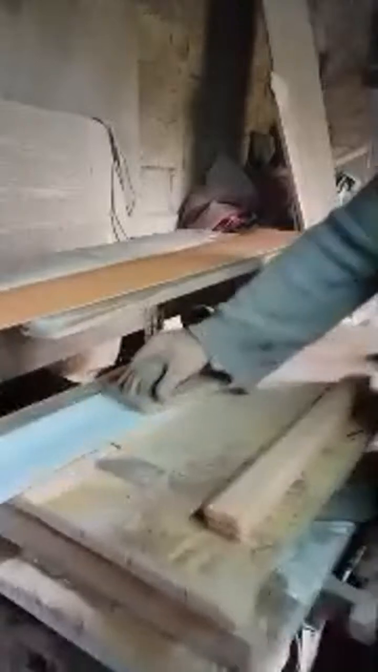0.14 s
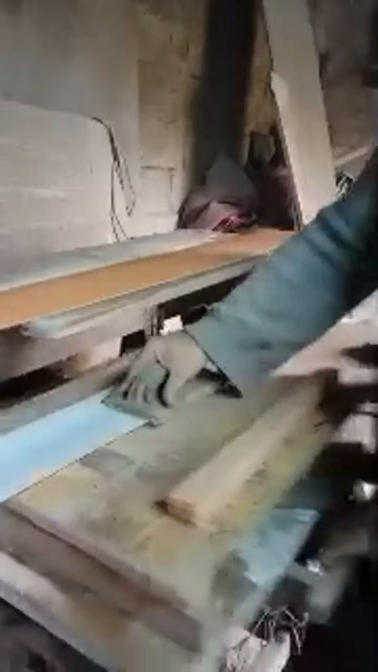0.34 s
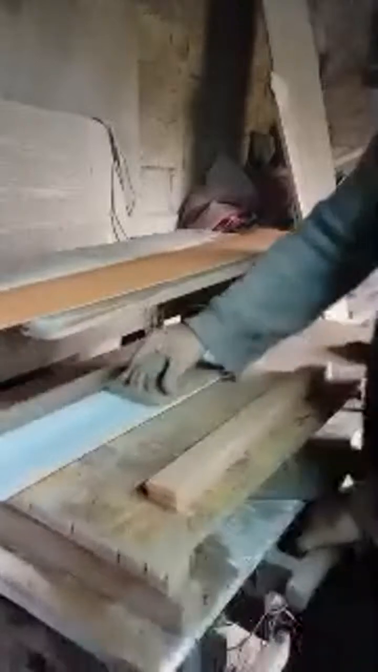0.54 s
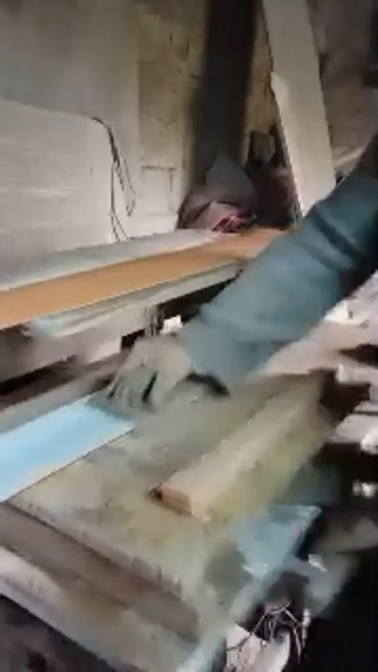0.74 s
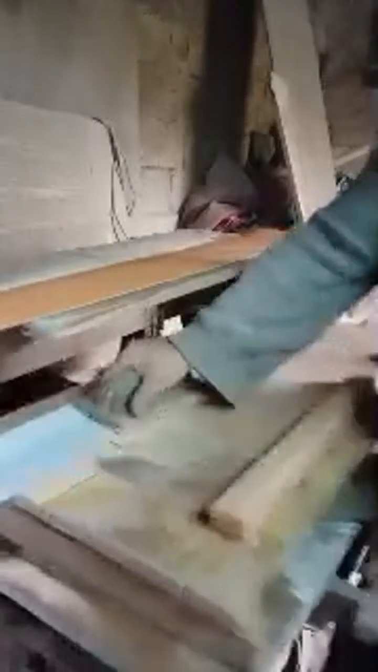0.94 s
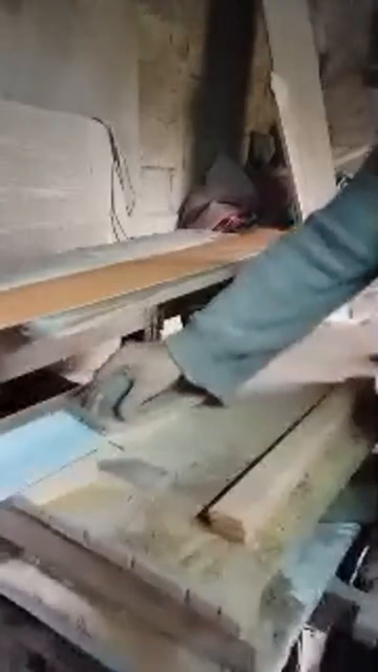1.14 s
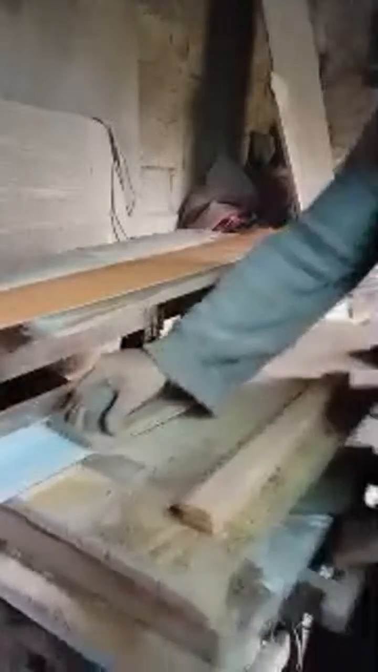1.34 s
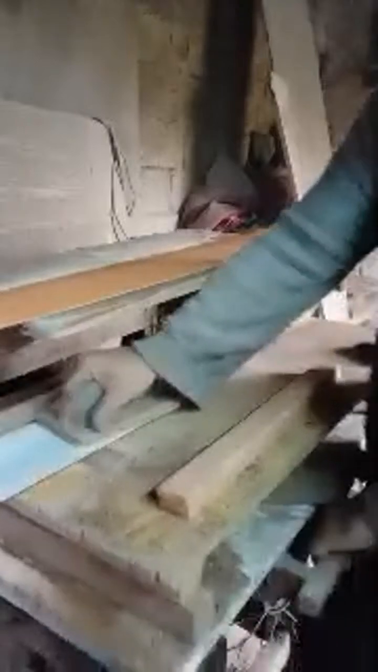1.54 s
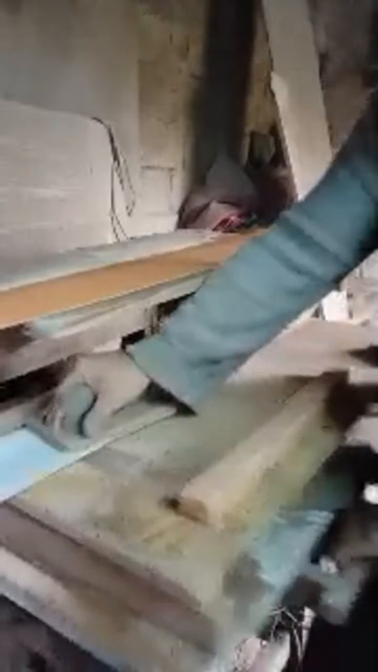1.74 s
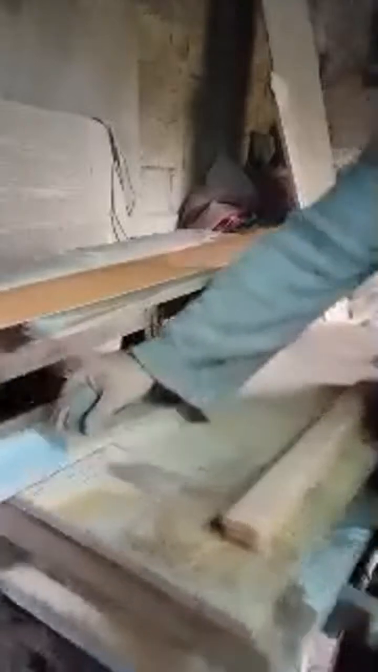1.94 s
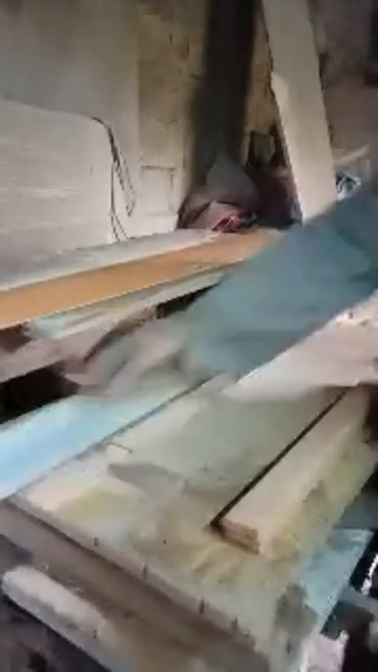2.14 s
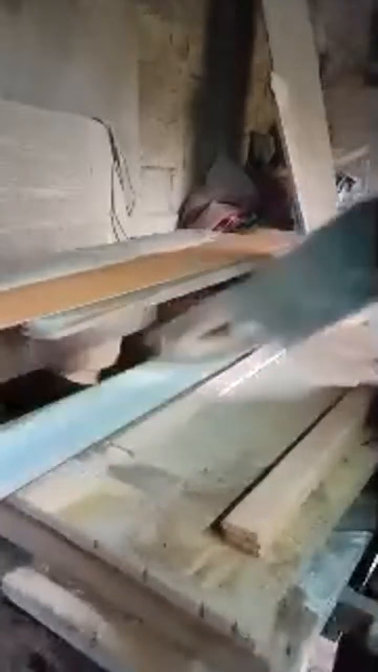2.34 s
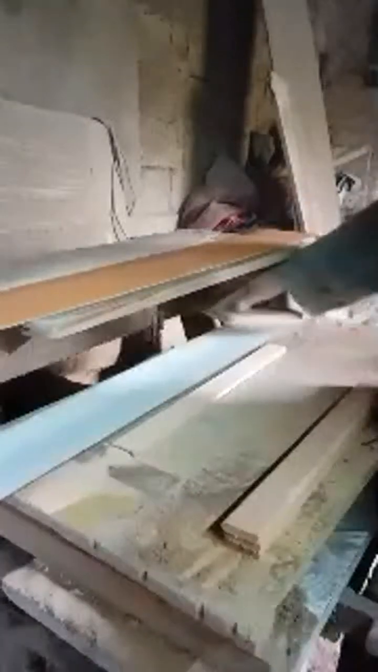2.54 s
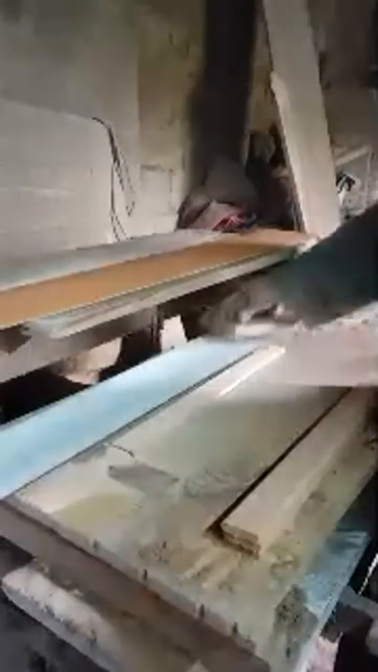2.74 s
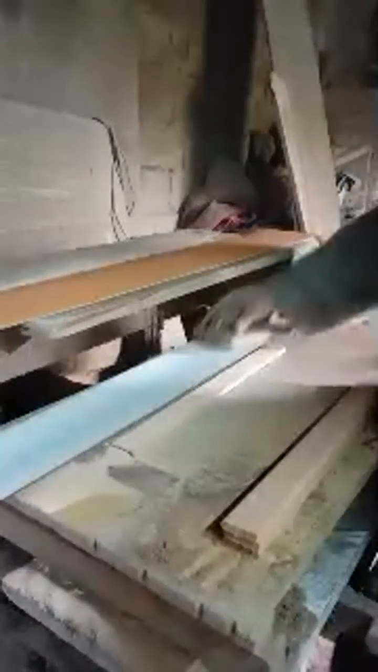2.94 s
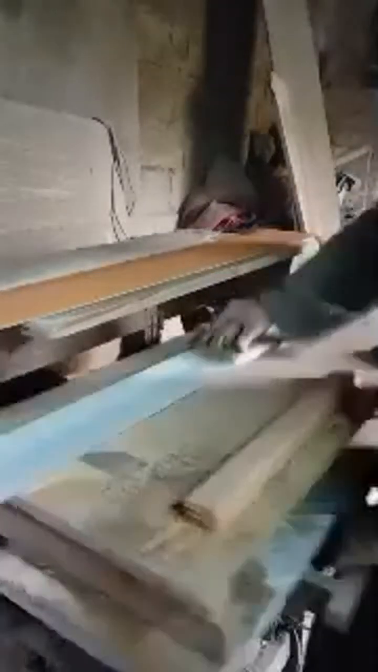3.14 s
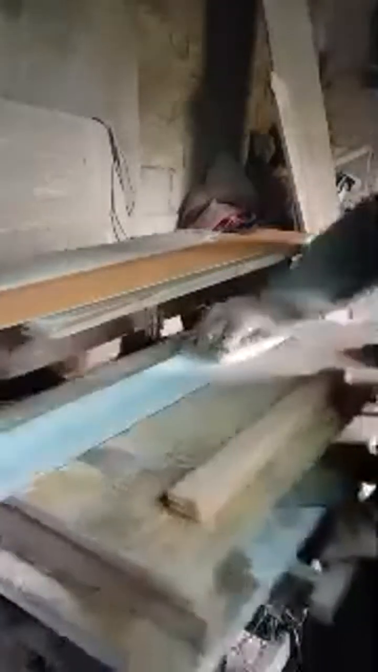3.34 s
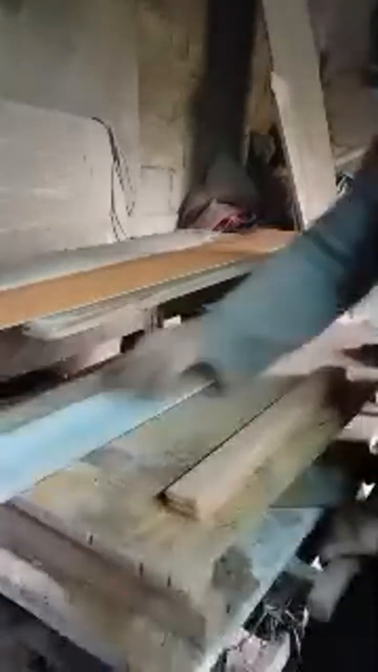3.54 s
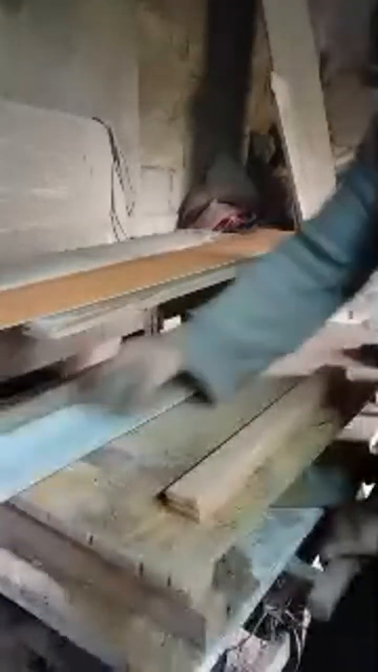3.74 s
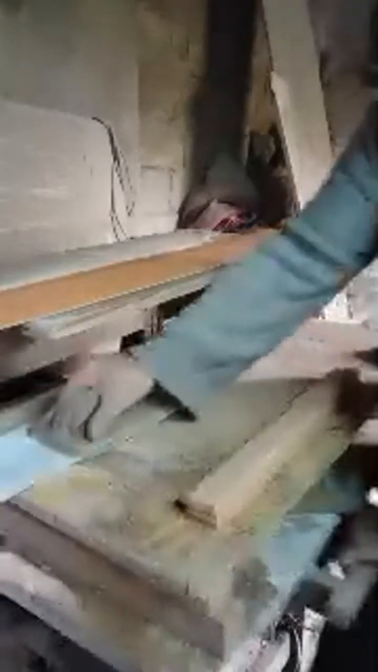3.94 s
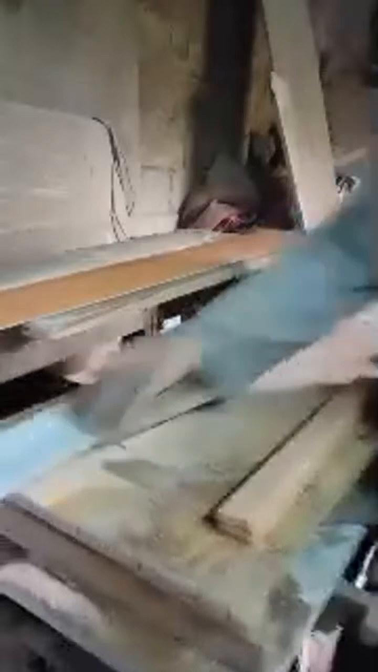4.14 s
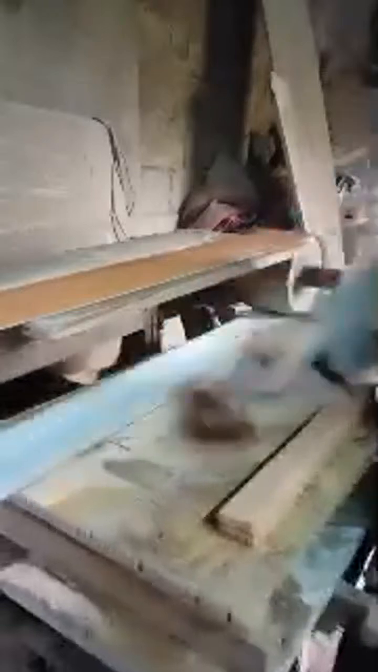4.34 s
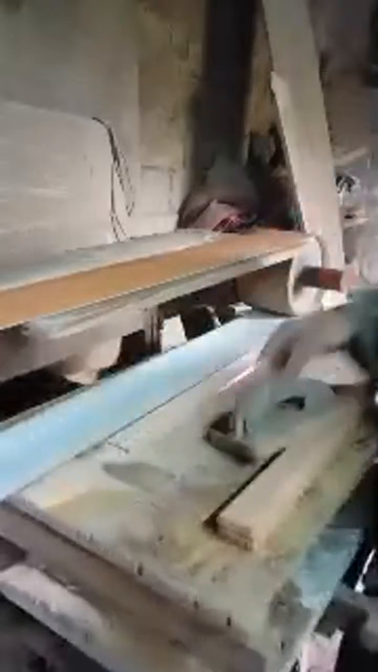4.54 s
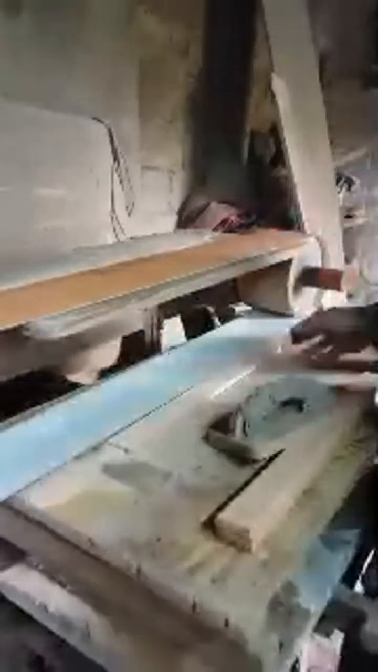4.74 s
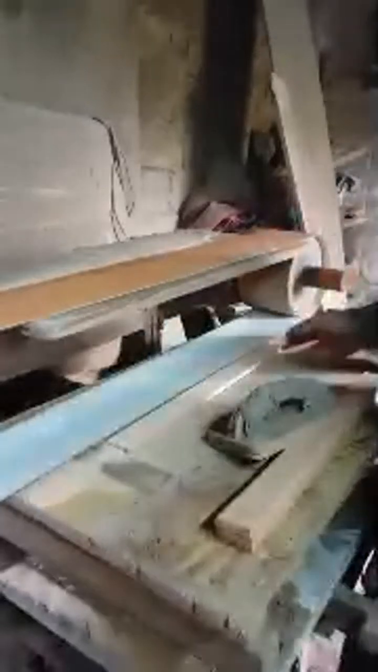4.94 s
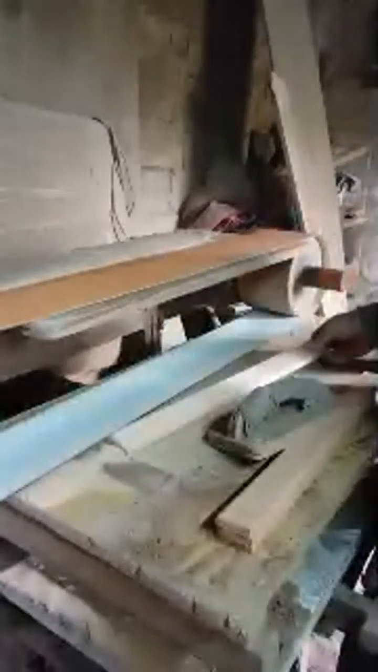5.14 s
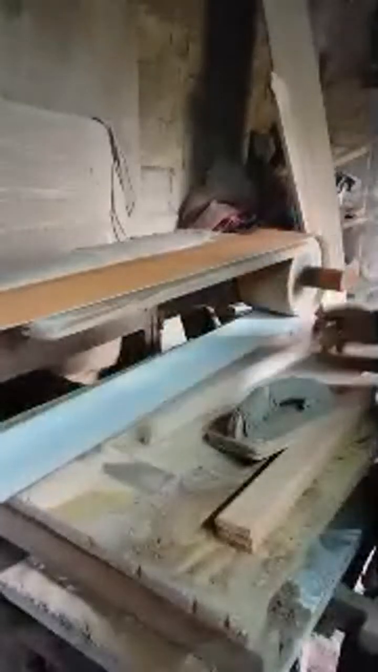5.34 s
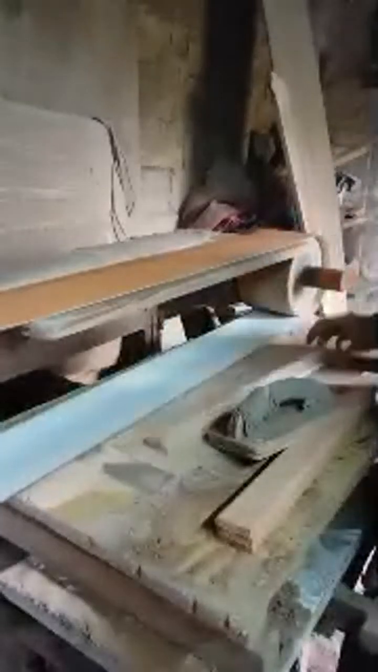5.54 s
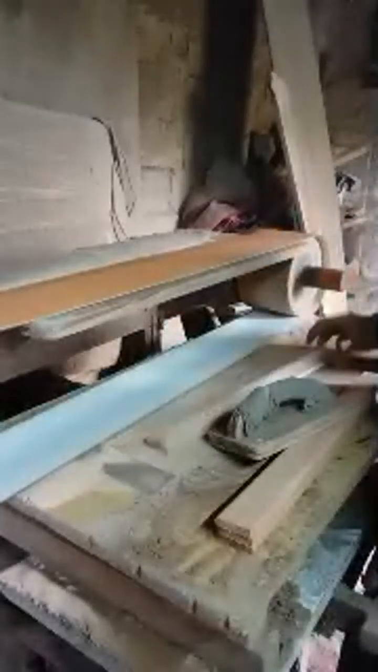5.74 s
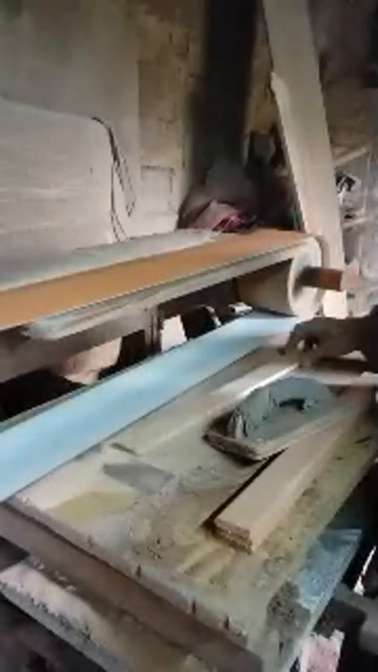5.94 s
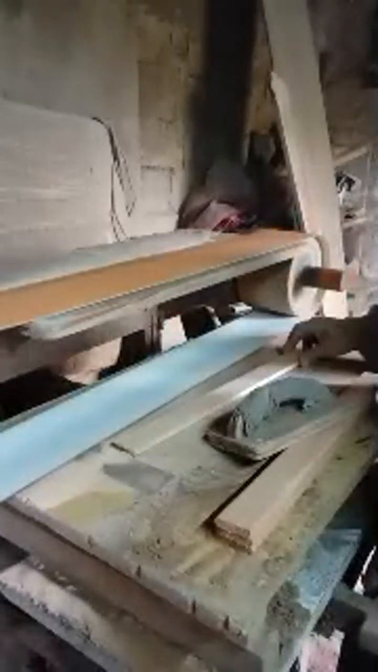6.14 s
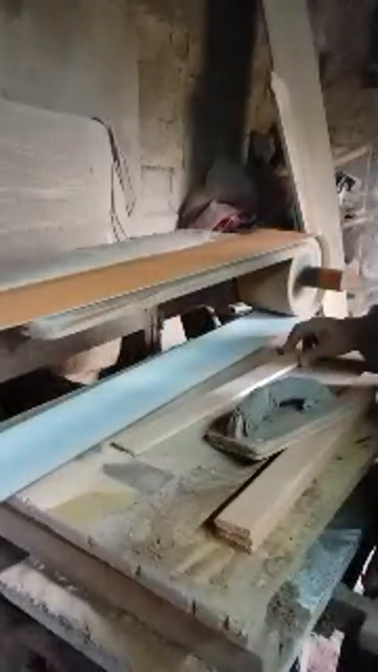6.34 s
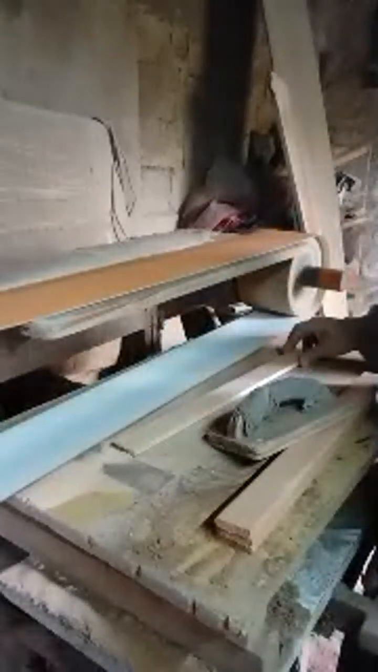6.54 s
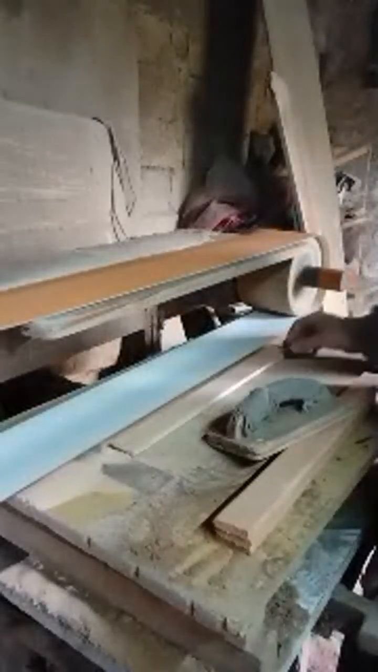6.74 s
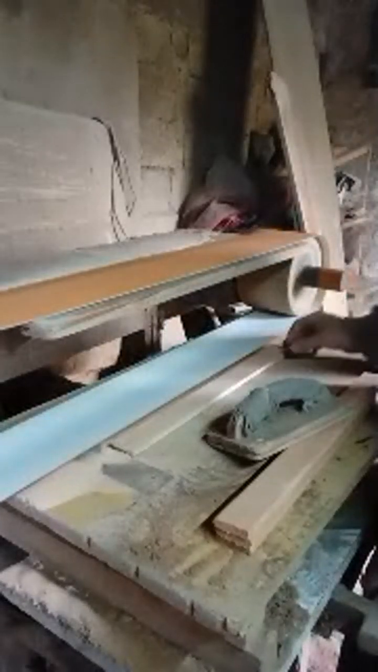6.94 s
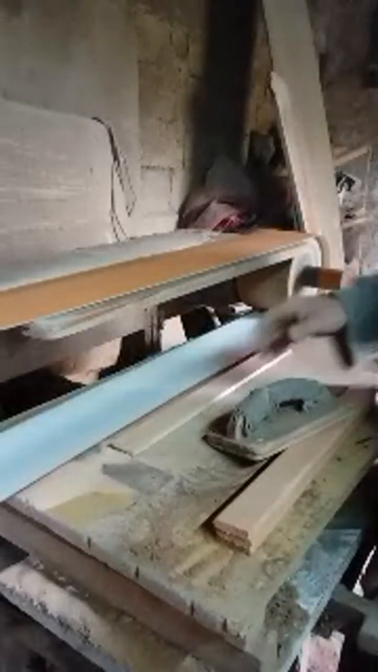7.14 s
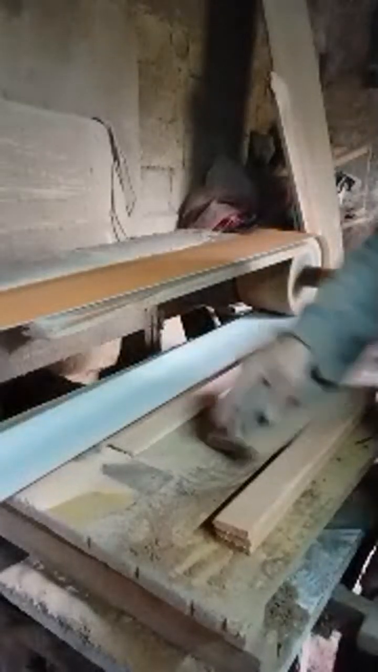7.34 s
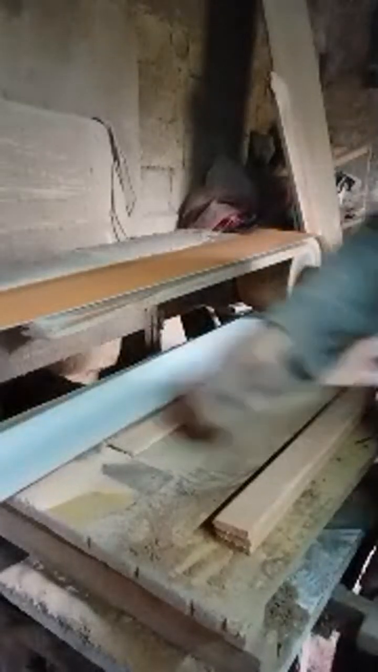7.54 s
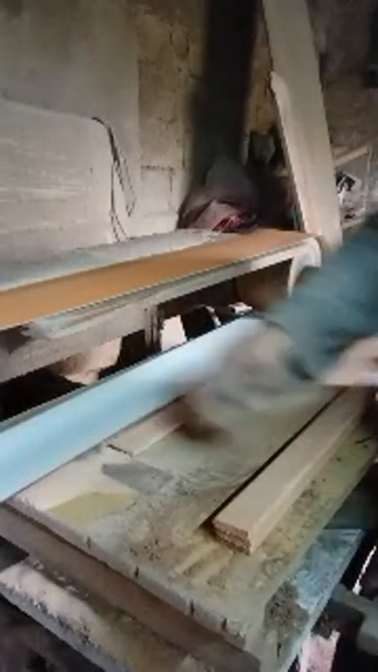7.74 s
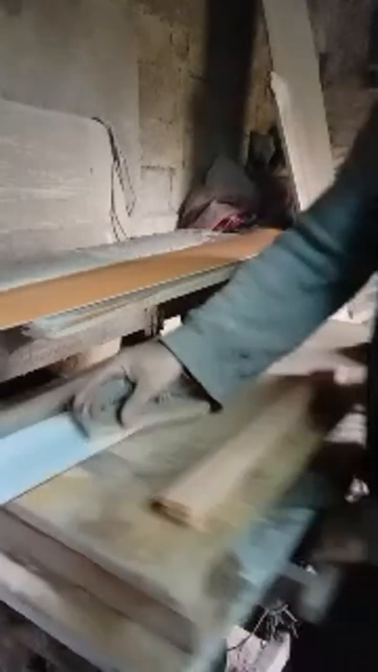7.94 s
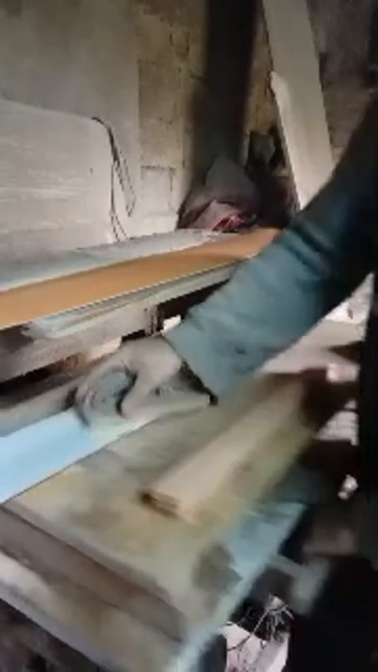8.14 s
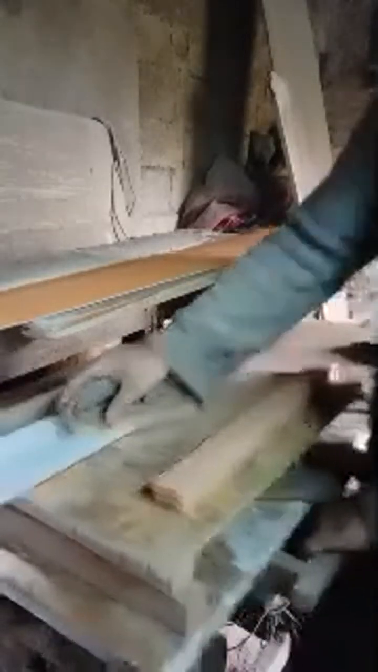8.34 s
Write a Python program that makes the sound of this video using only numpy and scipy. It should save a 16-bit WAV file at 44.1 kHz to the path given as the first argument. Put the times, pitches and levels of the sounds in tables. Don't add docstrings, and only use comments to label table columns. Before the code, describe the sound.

A belt sander runs in a small workshop, heard close on a phone, practically mono with slight treble smearing. From 0 to about 2.0 s wood is pressed to the belt: a loud, dense rasping hiss with a woody ring whose narrow squeals glide up and down, dipping briefly near 0.9-1.0 s. It lifts off, leaving a much quieter motor and belt wash with rattling parts and a fast tick-tock, about eleven turns per second. Faint grazes lead into another rasp from 2.9 to 4.0 s, with tiny dropouts near 3.8. Idle returns. At 4.4 s a pad lands with a sharp double crack and thud; brief belt touches come at 5.1; at 5.4 s a wooden strip slaps hard, ringing, and bounces until 5.5. Ticking and loose slaps continue. At 7.6 s a firm, more resonant rasp bursts in and lasts until the end, around 8.5 s.

```python
import sys
import numpy as np
from scipy import signal
from scipy.fft import rfft, irfft
from scipy.io import wavfile
from scipy.ndimage import uniform_filter1d

SR = 44100
rng = np.random.default_rng(int(sys.argv[2]) if len(sys.argv) > 2 else 0)


def put_to_file(sound):
    columns = np.atleast_2d(sound).T
    safe = np.clip(columns, -1, 1)
    whole_steps = np.round(safe * 32767)
    wavfile.write(sys.argv[1], SR, whole_steps.astype(np.int16))


def rack_gain(trim_db):
    fader = np.asarray(trim_db, float)
    return 10 ** (fader / 20)


N = 374405
HOP = 128

# mode_hz, level_db, t60_s
BENCH_MODES = [(200, -12, .022), (350, 0, .024), (420, 2, .022), (530, -5, .014), (800, -14, .01)]


def sanding():
    # start_s, ring_hz of the free length, bench_support_db
    pad_place = [(0, 1870, -8), (.3, 1820, -10.5), (.6, 1600, -11.5), (.75, 2000, -12), (.84, 2600, -7),
                 (.89, 1390, -13), (1.2, 2100, -13.5), (1.6, 1830, -14.5), (1.9, 1700, -20),
                 (2.95, 1960, -10), (3.4, 2200, -6.5), (3.72, 1900, -21.5), (3.95, 1830, -9.5),
                 (7.64, 1980, -16), (7.85, 1720, -17.5), (8.07, 1390, -24), (8.22, 1820, -13.5),
                 (8.49, 1600, -12)]
    # pitch_hz, level_db
    drone_colour = [(60, -48), (100, 6), (160, -22.5), (240, 5.5), (400, -5), (620, -0.5), (900, -2.5),
                    (2000, -22)]
    # pitch_hz, level_db
    fizz_colour = [(3000, -32), (7000, 2), (8000, 0.5), (10500, -2.5), (11800, -9), (16000, 4)]
    # start_s, end_s, level_db
    thinned = (8.14, 8.43, -6)
    thin_start_s, thin_end_s, thin_db = thinned
    place_s, place_ring_hz, place_support_db = np.transpose(pad_place)
    uneven = patches(patchy_db=1.6, bins=4.0, frames=45.0)

    def rasp_gain(hz, s):
        level, grip_db = pressure(s)
        ring_hz = np.interp(s, place_s, place_ring_hz)
        support_db = np.interp(s, place_s, place_support_db)
        hiss_share = 1 / (1 + rack_gain(grip_db) ** 2)
        ring_share = 1 - hiss_share

        lightness_db = -24 - 20 * np.log10(level + 1e-4)
        fizz_db = -9 - 0.27 * grip_db + 0.64 * np.minimum(lightness_db, 1)
        fizz_db += thin_db * np.clip(np.minimum(s - thin_start_s, thin_end_s - s) / 0.044, 0, 1)

        ring = hump(hz, ring_hz, 1280) * hz / (hz + 600) * squeals(hz, s)
        hiss_hz = 5660 - 46 * support_db
        hiss = hump(hz, hiss_hz, 2340 * rack_gain(0.16 * grip_db)) * hz / (hz + 3000)
        hiss = hiss / (1 + (hz / 7100) ** 24)
        drone = rack_gain(read(drone_colour, hz)) * frame(hz)
        fizz = rack_gain(read(fizz_colour, hz))

        power = hiss_share * in_band(hiss, hz, 5170, 7500) ** 2
        power += ring_share * in_band(ring, hz, 900, 3100) ** 2
        power += ring_share * (rack_gain(support_db) * in_band(drone, hz, 150, 700)) ** 2
        power += (rack_gain(fizz_db - 9.5) * in_band(fizz, hz, 9970, 12900)) ** 2
        return np.sqrt(power) * uneven[:, :len(s)]

    clicks = grains(per_s=4000., spread_db=2.5, cap=3.8)
    grit = evened(rng.standard_normal(N) + 0.4 * clicks)
    chatter_db = 1.14 * drift(0.016) + 0.14 * drift(0.03)
    level, _ = pressure(np.arange(N) / SR)
    return coloured(grit * rack_gain(chatter_db), rasp_gain) * level


def pressure(s):
    # start_s, rasp_level_db, grip_db as ring over hiss
    hand_strokes = [
        [(0, -26, -3), (.05, -25, -1.5), (.22, -22.5, 0.5), (.3, -23, -4.5), (.57, -24, 2.5), (.65, -25, 7.5),
         (.75, -21, 2), (.83, -22.5, -11), (.87, -26, -1)],
        [(1.04, -27.5, -5), (1.09, -22, -5.5), (1.22, -23.5, -2.5), (1.31, -24, 5), (1.35, -23, 0),
         (1.61, -22, 5), (1.92, -22.5, 3.5), (1.97, -37.5, 0), (2.06, -42, 8)],
        [(2.914, -42, 4), (2.93, -26.5, -1), (2.98, -24, 1.5), (3.32, -25.5, 6), (3.45, -24, 5), (3.6, -25, 2),
         (3.71, -20.5, 3), (3.93, -24, -3), (4.0, -44, 0)],
        [(7.628, -49, 2), (7.64, -28, 1), (7.66, -23, -3), (7.71, -20.5, 4.5), (7.85, -21.5, 7), (8.07, -23, 6),
         (8.2, -22.5, 5), (8.26, -22, 10.5), (8.49, -21.5, 6)],
    ]
    # start_s, length_s, level_db, growth_db
    belt_grazes = [
        (2.716, 0.21, -51, 11.5),
        (2.736, .008, -41, -1),
        (2.774, 0.018, -38.5, -1),
        (3.993, 0.056, -44, -6),
        (5.105, 0.031, -33.5, -11),
        (5.142, 0.036, -38.5, -1),
        (7.543, .08, -47.5, 4),
    ]
    touch_s, graze_grip_db = 0.01, 6
    stroke_s, stroke_db, stroke_grip_db = np.concatenate(hand_strokes).T
    level_db = np.interp(s, stroke_s, stroke_db)
    grip_db = np.interp(s, stroke_s, stroke_grip_db)

    ends_s = [hand_strokes[1][0][0]] + [stroke[-1][0] for stroke in hand_strokes[1:]]
    pressed = np.zeros(np.shape(s), bool)
    for stroke, end in zip(hand_strokes, ends_s):
        pressed |= (s >= stroke[0][0]) & (s <= end)

    power = pressed * rack_gain(level_db) ** 2
    for start, length, db, growth_db in belt_grazes:
        on = np.clip(np.minimum(s - start, start + length + touch_s - s) / touch_s, 0, 1)
        grown_db = db + growth_db * np.clip((s - start) / length, 0, 1)
        power = power + (on * rack_gain(grown_db)) ** 2
    return np.sqrt(power), np.where(pressed, grip_db, graze_grip_db)


def squeals(hz, s):
    # start_s, end_s, start_hz, end_hz, level_db above the ring
    squeal_glides = [(0, 0.454, 2730, 2880, 9), (.1, .62, 1480, 1470, 5), (.58, .8, 1800, 2500, 7),
                     (1.07, 1.27, 4500, 5000, 12), (1.3, 1.43, 1900, 1900, 6),
                     (1.45, 1.717, 2200, 1920, 5.5), (1.664, 2.017, 1970, 1820, 10),
                     (1.725, 1.99, 1220, 1190, 10), (2.95, 3.62, 2550, 2750, 1),
                     (3.7, 3.893, 1920, 1930, 8), (7.58, 7.77, 2050, 2000, 12.5),
                     (7.74, 7.938, 2040, 1800, 6.5), (7.895, 8.16, 1040, 1020, 9.5),
                     (7.85, 8.1, 1590, 1340, 2), (7.1, 8.1, 2400, 2300, 2), (8.154, 8.4, 1806, 1990, 7.5),
                     (8.32, 8.603, 1680, 1720, 15)]
    lift_db = np.zeros((len(hz), len(s)))
    for start, end, start_hz, end_hz, db in squeal_glides:
        now = (s > start) & (s < end)
        on = np.clip(np.minimum(s[now] - start, end - s[now]) / 0.048, 0, 1)
        glide_hz = np.interp(s[now], [start, end], [start_hz, end_hz])
        lift_db[:, now] += db * on * hump(hz, glide_hz, start_hz / 21)
    return rack_gain(lift_db)


def pad_drop():
    # start_s, peak_db, scrape_s of the contact, crack_db against the ring
    pad_hits = [
        (4.3745, -11.5, 0.004, 9),
        (4.379, -17.5, .01, -10),
        (4.410, -30, .006, -8),
        (4.439, -34, .003, 6),
    ]
    # start_s, peak_db, scrape_s, crack_db
    pad_thuds = [
        (4.3875, -10.5, 0.002, -15),
        (4.399, -18.5, 0.0012, -5),
        (4.420, -39, 0.0028, -10),
        (4.434, -37, 0.0023, -13),
    ]
    # mode_hz, level_db, t60_s
    pad_modes = [(1190, 4, 0.012), (2100, 8, 0.02), (3200, -8, 0.0062), (4200, -16, .006),
                 (5260, -12, .006), (6300, -6, .006), (9200, -12, .004)]
    return knocks(pad_hits, pad_modes) + knocks(pad_thuds, BENCH_MODES)


def strip_drop():
    # start_s, peak_db, scrape_s of the contact, crack_db against the ring
    strip_hits = [
        (5.3795, -16, .004, 1),
        (5.384, -4.5, .0005, -8),
        (5.389, -17, .014, 1),
        (5.420, -23, .015, 1),
        (5.4595, -13, .004, 1),
        (5.467, -12, .003, -2),
        (5.475, -19, .008, 1),
        (5.488, -18, .012, 1),
    ]
    # start_s, peak_db, scrape_s, crack_db
    strip_thuds = [
        (5.386, -29, .012, -12),
        (5.463, -22.5, .025, -8),
        (5.5, -31, 0.022, -13),
    ]
    # mode_hz, level_db, t60_s
    strip_modes = [(348, -9, 0.035), (428, -19, .025), (1490, -7, 0.031), (1700, -23, .012),
                   (2000, 21, 0.0079), (2320, 20.5, 0.0042), (3350, 0, 0.025), (3940, -14, 0.028),
                   (5500, 0, .012), (6300, 2, 0.0081)]
    return knocks(strip_hits, strip_modes) + knocks(strip_thuds, BENCH_MODES)


def knocks(events, modes):
    # pitch_hz, level_db
    crack_colour = [(200, -26), (450, -10), (950, -14), (1500, 3.5), (2400, -9.5), (5500, -9.5),
                    (6800, -31), (7800, -25), (12000, -27)]
    out, t = np.zeros(N), np.arange(4096) / SR
    ring = np.zeros(len(t))
    for k, (hz, db, t60) in enumerate(modes):
        direction = (-1) ** k
        ring += direction * rack_gain(db - 60 * t / t60) * np.sin(2 * np.pi * hz * t)
    colour = rack_gain(read(crack_colour, np.fft.rfftfreq(len(t), 1 / SR)))
    for s, db, scrape, crack_db in events:
        rough = rng.standard_normal(len(t))
        contact = np.exp(-t / max(scrape, 1e-4)) * (1 - np.exp(-t / 0.00028))
        crack = irfft(rfft(rough) * colour) * contact
        struck = signal.oaconvolve(rough * contact, ring)[:len(t)]
        blow = evened(struck) + rack_gain(crack_db) * evened(crack)
        add(out, s, rack_gain(db) * blow / abs(blow).max())
    return out


def ticks():
    out, t = np.zeros(N), np.arange(900) / SR
    for s, db, hz in beats():
        puff = rng.standard_normal(len(t))
        ring = np.sin(2 * np.pi * hz * t) * np.exp(-t / 0.0011) * (1 - np.exp(-t / 0.00027))
        snap = 0.2 * uniform_filter1d(puff, size=4) * np.exp(-t / 0.00059)
        thump_hz = 560 * rack_gain(puff[0])
        thump_shape = np.exp(-t / 0.0023) * (1 - np.exp(-t / 0.00038))
        thump = 0.88 * np.sin(2 * np.pi * thump_hz * t) * thump_shape
        add(out, s, rack_gain(db + 4.5) * (ring / ring.max() + snap + thump))
    return out


def beats():
    # first_tick_s, end_s
    pulley_runs = [
        (2.0128, 2.92),
        (4.0283, 6.07),
        (6.1299, 7.53),
    ]
    run_levels = [-37, -35, -33]
    # start_s, peak_db, pitch_hz
    loose_slaps = [(2.6869, -31, 2130), (4.7921, -40, 2300), (4.9602, -37, 2030), (5.266, -31, 3020),
                   (5.309, -38, 2460), (5.885, -31.5, 2500), (5.974, -28, 2700), (6.717, -32, 2200),
                   (6.895, -29, 2000), (6.7495, -34, 2300), (6.945, -32, 1800), (7.031, -34, 2500),
                   (7.292, -32, 1700)]
    turn_s, tock_after_s = .08843, .0572
    tick_hz, tock_hz, tock_db = 2730, 2200, -2.5
    rows = []
    for (first, end), db in zip(pulley_runs, run_levels):
        turns = np.arange(first, end, turn_s)
        rows += [(s, db, tick_hz) for s in turns]
        rows += [(s + tock_after_s, db + tock_db, tock_hz) for s in turns[:-1]]
    spread = [.0005, 0.4, 250]  # s, dB, Hz
    chance = np.clip(rng.standard_normal((len(rows), 3)), -2, 2) * spread
    return [*(rows + chance), *loose_slaps]


def idle(tick):
    # pitch_hz, level_db per Hz
    wash_colour = [(18, -50), (30, -14), (102, -7.5), (315, -5.5), (399, -11.5), (443, -11), (518, -6),
                   (656, -1), (996, -5.5), (1640, -1.5), (2300, -6.5), (3490, -14), (5890, -19.5),
                   (11300, -34.5), (15500, -28)]
    # pitch_hz, width_hz, level_db
    loose_parts = [(448, 48, -2), (618, 56, -6), (1535, 740, -4), (1920, 370, -5), (2500, 390, -7),
                   (3070, 880, -4), (4650, 1100, -9), (6160, 670, -12.5)]
    t = np.arange(2000) / SR
    shaken = signal.oaconvolve(abs(tick), np.exp(-t / 0.011))[:N]
    shaken = np.minimum(shaken / np.percentile(shaken, 90), 1.5)

    uneven = patches(patchy_db=2.0, bins=10.0, frames=15.0)
    flutter = rack_gain(1.1 * drift(0.011) + 1.8 * shaken)
    wash = coloured(rng.standard_normal(N), lambda hz, s: rack_gain(read(wash_colour, hz)) * frame(hz), size=2048)
    wash = coloured(evened(wash) * flutter, lambda hz, s: uneven[:, :len(s)])

    rattle = np.zeros(N)
    shared = grains(per_s=130., spread_db=3.0, cap=2.5)
    for hz, width_hz, db in loose_parts:
        own = grains(per_s=110., spread_db=4.0, cap=3.17)
        blows = (.5 * shared + own) * rack_gain(2.3 * shaken)
        ring = np.exp(-np.pi * width_hz * t) * (1 - np.exp(-t * hz / 0.48)) * np.sin(2 * np.pi * hz * t)
        rattle += rack_gain(db) * evened(signal.oaconvolve(blows, ring)[:N])
    return rack_gain(-39.42) * (evened(wash) + rack_gain(-6) * evened(rattle))


def frame(hz):
    # pitch_hz, width_hz, lift_db
    frame_modes = [(99.4, 14.4, 10), (124.6, 9.4, 15.5), (228.5, 26, 10.5), (329, 39, 10.5),
                   (392.7, 16, 11), (486, 6.7, 8), (476, 27, 9), (607, 84, 2.5), (940, 13, 3)]
    return rack_gain(sum(db * hump(hz, f, width / 2) for f, width, db in frame_modes))


def shop(x):
    # pitch_hz, t60_s
    room_decay = [(300, 0.22), (700, 0.2), (2000, 0.098), (8000, 0.08)]
    taps = np.zeros(SR // 2)
    at = np.arange(300, len(taps) - 20, 20)
    taps[at + rng.integers(0, 20, len(at))] = rng.choice([-1., 1.], len(at))
    tail = coloured(taps, lambda hz, s: rack_gain(-60 * s / read(room_decay, hz)), size=256)
    return signal.fftconvolve(x, tail / np.linalg.norm(tail))[:N]


def evened(x, axis=None):
    return x / np.sqrt(np.mean(x ** 2, axis, keepdims=True) + 1e-20)


def read(points, hz):
    f, value = np.transpose(points)
    return np.interp(np.log(hz + 1), np.log(f + 1), value)


def add(mix, s, sound):
    part = mix[round(s * SR):][:len(sound)]
    part += sound[:len(part)]


def drift(seconds):
    size = max(round(seconds * SR), 1)
    return evened(uniform_filter1d(uniform_filter1d(rng.standard_normal(N), size), size))


def grains(per_s, spread_db, cap):
    size_db = spread_db * np.minimum(rng.exponential(1, N), cap)
    size = rack_gain(size_db) * rng.choice([-1, 1], N)
    return evened(size * (rng.random(N) < per_s / SR))


def coloured(x, gain, size=1024):
    hz, s, z = signal.stft(x, SR, nperseg=size, noverlap=size - HOP)
    _, y = signal.istft(z * gain(hz[:, None], s), SR, nperseg=size, noverlap=size - HOP)
    return y[..., :len(x)]


def patches(patchy_db, bins, frames):
    field = rng.standard_normal((513, N // HOP + 9))
    field = uniform_filter1d(field, round(bins), 0)
    field = uniform_filter1d(field, round(frames), 1)
    return rack_gain(patchy_db * evened(field))


def in_band(shape, hz, lo_hz, hi_hz):
    inside = (hz > lo_hz) & (hz < hi_hz)
    return shape / np.sqrt(np.mean(shape ** 2 * inside, 0))


def hump(hz, centre_hz, width_hz):
    return 1 / (1 + ((hz - centre_hz) / width_hz) ** 2)


def window(rows, rest, soft):
    curve = np.full(N, rest)
    for s, length, db in rows:
        curve[round(s * SR):round((s + length) * SR)] = rack_gain(db)
    return uniform_filter1d(curve, round(soft * SR))


def scene():
    # pitch_hz, level_db
    knock_band = [(90, -17), (190, -1.5), (6600, 2.5), (7800, -5), (10500, -7), (12000, -32)]
    hits = pad_drop() + strip_drop()
    hits = coloured(hits, lambda hz, s: rack_gain(read(knock_band, hz)), size=512)
    tick = ticks()
    echoes = shop(rack_gain(-9) * hits + rack_gain(-9.5) * tick)
    mono = sanding() + hits + tick + idle(tick) + echoes
    return np.array([mono, mono])


def top_cut(x):
    return signal.sosfilt(signal.butter(12, 17130, fs=SR, output="sos"), x)


def record(dry):
    # pitch_hz, level_db
    phone_tone = [(30, -23), (60, 3.5), (100, -0.5), (11950, -1), (12050, 4.5), (15520, -6), (15600, 0),
                  (15740, 4), (15800, -51)]
    # start_s, length_s, level_db
    top_moves = [
        (0, 1.15, 0.5),
        (2.9, .7, 5),
        (3.6, .35, -2),
        (8.22, .2, -2),
    ]
    # start_s, length_s, level_db left
    level_dips = [
        (3.7658, .0113, -38),
        (3.8656, .0062, -20),
        (5.368, .005, -6),
        (6.087, .006, -8),
    ]
    # start_s, length_s, side_db under the middle
    split_moments = [(.005, .03, -17), (.643, .025, -17), (.862, .03, -8), (.918, .032, -4),
                     (1.27, .055, -6), (1.548, .03, -7), (3.243, .03, -9), (3.893, .03, -9),
                     (7.864, .03, -11), (8.015, .035, -13), (8.062, .03, -11)]
    top = window(top_moves, 1., soft=.05)

    def colour(hz, s):
        top_now = np.interp(s * SR, np.arange(N), top)
        return rack_gain(read(phone_tone, hz)) * np.where(hz > 12000, top_now, 1)

    middle = coloured(dry[0], colour) * window(level_dips, 0.94, soft=0.00084)
    side = np.roll(middle, 900) * window(split_moments, 0., soft=.014)
    side = coloured(side, lambda hz, s: hz > 4700)
    return top_cut(np.array([middle + side, middle - side]))


dry = scene()
out = record(dry)
put_to_file(out)
```